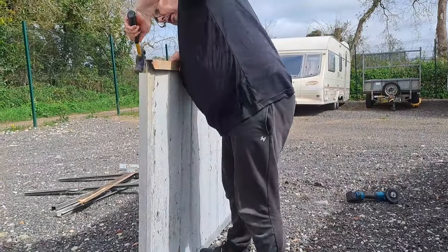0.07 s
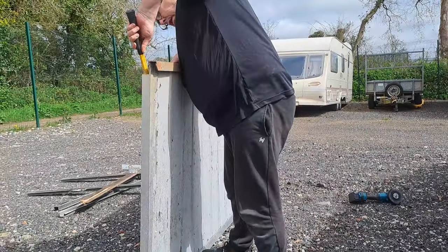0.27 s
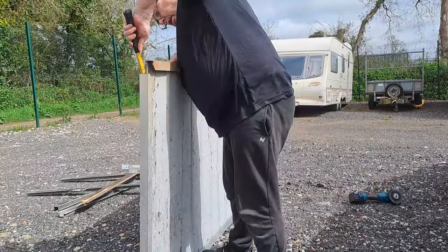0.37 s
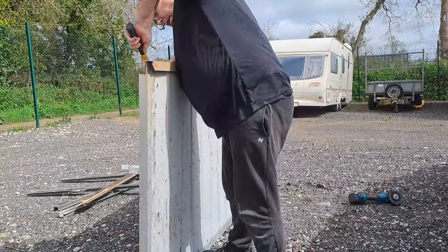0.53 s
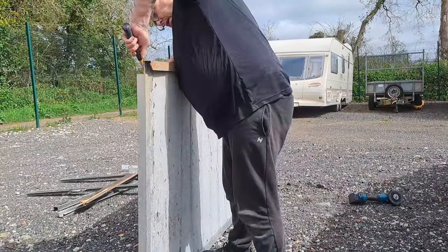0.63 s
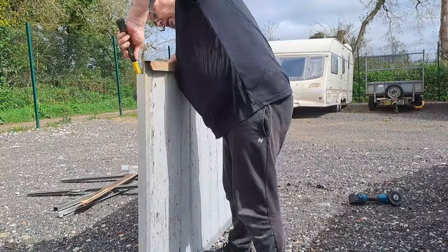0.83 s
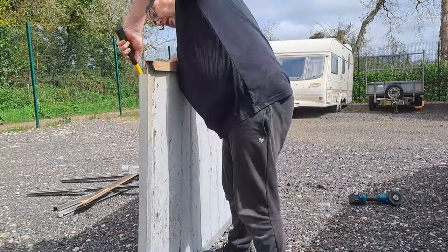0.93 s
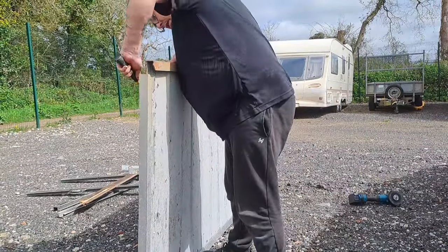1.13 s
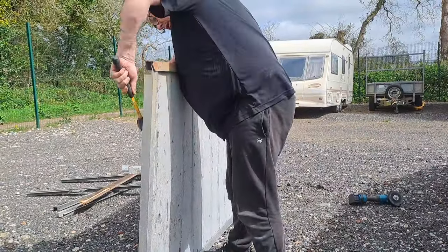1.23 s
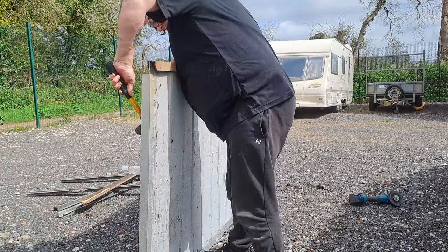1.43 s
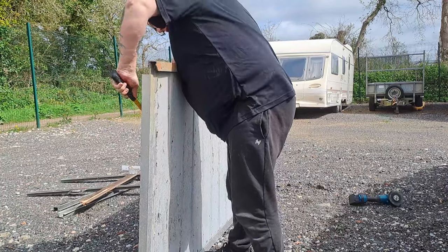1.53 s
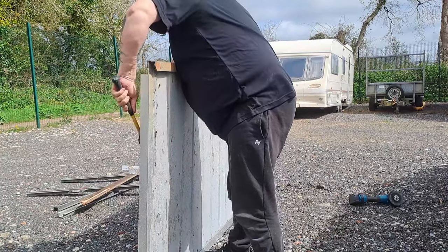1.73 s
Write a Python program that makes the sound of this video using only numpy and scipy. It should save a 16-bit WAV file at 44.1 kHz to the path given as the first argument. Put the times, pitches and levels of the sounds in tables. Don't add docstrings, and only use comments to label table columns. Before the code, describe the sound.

Three loud hammer blows strike a metal-edged panel about half a second apart, each a sharp steel crack with a hollow boom and a clattering loose fitting, heard a few metres away in an open yard.

```python
import sys
import numpy as np
from scipy import signal
from scipy.fft import rfft, irfft
from scipy.io import wavfile
from scipy.ndimage import uniform_filter1d, minimum_filter1d, map_coordinates

SR = 44100
rng = np.random.default_rng(int(sys.argv[2]) if len(sys.argv) > 2 else 0)


def rack_gain(trim_db):
    fader = np.asarray(trim_db, float)
    return 10 ** (fader / 20)


def store_wav(level_fs):
    pcm = np.round(np.clip(np.atleast_2d(level_fs), -1, 1) * 32767)
    wavfile.write(sys.argv[1], SR, pcm.T.astype(np.int16))


N = 79380
CHATTER_DB, CHATTER_PER_S = 1.5, 420


def unit(x):
    return x / np.sqrt(np.mean(x ** 2) + 1e-20)


def along(points, hz):
    f, v = np.transpose(points)
    return np.interp(np.log(hz + 1), np.log(f + 1), v)


def wobble(rate, size):
    knots = rng.standard_normal(int(size * rate / SR) + 4)
    return map_coordinates(knots, [np.arange(size) * rate / SR])


def empty_track():
    return np.zeros((2, N + SR))


def add(track, sound, s):
    i = SR + round(s * SR)
    track[:, i:i + sound.shape[-1]] += sound[..., :track.shape[1] - i]


# frequency in Hz, left-right likeness from -1 to 1.
LIKENESS = [(40, 0.064), (130, 0.66), (290, 0.92), (640, 0.72), (1410, 0.68), (3100, 0.42), (6820, 0.022),
            (15000, -0.2)]


def wash(spectrum, t60, size, tilt_db=0, window=256):
    hz, t, z = signal.stft(rng.standard_normal((2, size)), SR, nperseg=window)
    angle = np.arccos(np.clip(along(LIKENESS, hz), -1, 1)) / 2
    colour = rack_gain(along(spectrum, hz) + tilt_db * np.log2(hz / 1000 + 1))
    z = z * (colour * [np.cos(angle), np.sin(angle)])[..., None]

    patches = uniform_filter1d(rng.standard_normal(z.shape[1:]), size=5, axis=0)
    patches = uniform_filter1d(patches, size=3, axis=1)
    z = z * rack_gain(1.8 * unit(patches))
    level = np.sqrt(np.mean(signal.istft(z, SR, nperseg=window)[1] ** 2) * 2)

    decay = rack_gain(-60 * t / along(t60, hz)[:, None])
    lead_s, rise_cycles = 0.003, 1.9
    rise = np.tanh((t + lead_s) * (hz[:, None] + 20) / rise_cycles)
    mid, side = signal.istft(z * decay * rise, SR, nperseg=window)[1][:, :size] / level
    return np.array([mid + side, mid - side])


# frequency in Hz, density in dB per Hz.
RUMBLE_SPECTRUM = [(20, -25), (45, -2), (90, -9), (140, -12), (250, -27.5), (1500, -37.5), (3500, -55.5),
                   (6000, -110)]
# time in seconds, wind strength in dB.
GUSTS = [(0.0, -32.5), (0.044, -44), (0.104, -32.5), (0.144, -42), (0.2, -37), (0.23, -29), (0.41, -44.5),
         (0.43, -27), (0.54, -40.5), (0.722, -42), (0.756, -32), (1.192, -61), (1.332, -25), (1.382, -51),
         (1.564, -38), (1.594, -74), (1.658, -37), (1.8, -62)]
# frequency in Hz, density in dB per Hz.
LEAF_SPECTRUM = [(200, -5), (1500, -2), (4000, -5.5), (12000, -9.5), (16000, -20.5)]


def yard():
    endless = [(100, 1e6)]
    rumble_db, swing_db, leaves_db = -1, 2, -69.5
    strength_db = np.interp(np.arange(N) / SR, *np.transpose(GUSTS))
    gusts = rack_gain(strength_db + rumble_db + swing_db * wobble(7.9, N))
    wind = gusts * wash(RUMBLE_SPECTRUM, endless, N, window=2048)
    return wind + rack_gain(leaves_db) * wash(LEAF_SPECTRUM, endless, N)


# start in seconds, peak level in dB, frequency in Hz.
ROCKING_THUDS = [(0.085, -34.5, 96), (0.425, -26, 103.4), (0.465, -30, 124), (0.58, -35, 108.4),
                 (0.67, -37, 70.4), (0.77, -22.5, 97.8), (0.86, -22.5, 124.2), (1.24, -45, 80),
                 (1.34, -24, 114), (1.43, -27.5, 126.3), (1.65, -33, 132.8)]


def thuds():
    out, t = empty_track(), np.arange(SR // 3) / SR
    rise_s, t60_s = 0.0072, 0.29
    for s, db, hz in ROCKING_THUDS:
        envelope = rack_gain(db - 60 * t / t60_s) * (1 - np.exp(-t / rise_s)) ** 2
        add(out, envelope * np.sin(2 * np.pi * hz * t + wobble(19, len(t))), s)
    return out[:, SR:]


# start in seconds, peak level in dB, ring frequency in Hz.
REBOUNDS = [
    (0.2279, -30, 3280),
    (0.4647, -37, 2920),
    (0.7876, -11, 3730),
    (0.8674, -32, 3080),
    (1.3302, -11.5, 3600),
    (1.4094, -13.5, 3670),
]


def clacks():
    out, t = empty_track(), np.arange(SR // 10) / SR
    level_db, t60_s, spread = -8.5, 0.035, 0.12
    for s, db, hz in REBOUNDS:
        detune = 1 + spread * np.linspace(-1, 1, 5)[:, None]
        bunch = np.sin(2 * np.pi * hz * t * detune + 6 * rng.random((5, 1)))
        envelope = rack_gain(db + level_db - 60 * t / t60_s) * np.minimum(1, t * 2000)
        add(out, envelope * bunch.sum(0), s)
    return out[:, SR:]


# start in seconds, peak level in dB, ring
# frequency in Hz, brightness in dB per octave.
KNOCKS = [(0.0096, -30.5, 2196, -3), (0.0825, -38, 2700, -2.5), (0.1597, -33.5, 2000, -5),
          (0.227, -6, 3540, -1), (0.2644, -19.5, 2320, -3), (0.3063, -21, 2600, 2.5),
          (0.3406, -23, 2360, 1), (0.4107, -27, 2240, 0.5), (0.4479, -25, 2130, 2.5),
          (0.4642, -23, 3000, 1.5), (0.5144, -32, 2370, -0.5), (0.5774, -37.5, 3960, 0.5),
          (0.6, -35.5, 3090, 0.5), (0.6763, -49, 2260, -3), (0.7876, -10.5, 3620, -0.5),
          (0.8664, -18.5, 3050, 1.5), (0.8915, -26, 2200, 3), (0.9283, -27.5, 2260, 1.5),
          (0.9834, -31, 3140, 0), (1.0091, -27.5, 2350, 1), (1.074, -28, 2210, -2.5),
          (1.117, -31, 2250, -2), (1.3299, -8.5, 2420, 2.5), (1.4093, -15, 3940, 2.5),
          (1.454, -20, 2270, 2), (1.501, -21, 3000, 0), (1.5297, -22, 3970, 1.5), (1.587, -27, 4000, -0.5),
          (1.6272, -27.5, 2470, -2.5), (1.7075, -43, 3640, -1),
          (0.359, -31, 3070, 13), (0.3788, -29.5, 2980, 6), (0.6294, -53, 3000, 5.5),
           (0.8423, -24.5, 2850, 15), (0.9135, -30, 3060, -1), (0.9735, -28.5, 3100, 2),
           (1.0393, -35, 3030, -2), (1.1352, -44.5, 2970, 3), (1.3593, -17, 2970, 3), (1.383, -19, 3080, 5),
           (1.429, -22, 2900, 3), (1.4823, -24, 3030, 0.5), (1.5552, -24.5, 3000, -0.5),
           (1.642, -44, 2880, -3), (1.664, -46, 2960, 3), (1.696, -44.5, 3000, 0),
           (0.001, -42.5, 2940, 4.5), (0.065, -46.5, 3000, 4), (0.107, -46, 2500, -0.5),
           (0.134, -47.5, 2500, -2), (0.49, -36, 3000, 1.5), (0.534, -48, 2200, -1),
           (0.612, -45, 4050, -1.5), (0.64, -48, 990, -4.5), (1.21, -52, 2960, -1)]
# frequency in Hz, density in dB per Hz.
FITTING_SPECTRUM = [(180, -46), (300, -9.5), (820, -3.5), (3190, -7.5), (6140, -15.5), (12000, -14.5),
                    (15700, -24.5), (16500, -50.5)]
# frequency in Hz, t60 in seconds.
FITTING_DECAY = [(400, 0.22), (2000, 0.19), (5000, 0.097), (14000, 0.085)]


def rattles():
    out, t = empty_track(), np.arange(SR // 4) / SR
    knock_db, rise_s = -6, 0.0012
    ping_db, ping_t60_s, ping_spread = -17, 0.044, 0.056
    note_hz, note_db, note_t60_s = 4080, -20, 0.077
    note = rack_gain(note_db - 60 * t / note_t60_s) * np.sin(2 * np.pi * note_hz * t)
    for s, db, hz, bright_db in KNOCKS:
        buzz = rack_gain(knock_db + CHATTER_DB * wobble(CHATTER_PER_S, len(t)))
        crash = wash(FITTING_SPECTRUM, FITTING_DECAY, len(t), bright_db)
        knock = buzz * crash * (1 - np.exp(-t / rise_s))
        detune = 1 + ping_spread * rng.standard_normal((3, 1))
        pings = np.sin(2 * np.pi * hz * t * detune).sum(0)
        pings = rack_gain(ping_db - 60 * t / ping_t60_s) * pings
        add(out, rack_gain(db) * (knock + pings + note), s)
    return out[:, SR:]


# start in seconds, peak level in dB, boom level in dB, brightness in dB per octave.
HAMMER_BLOWS = [
    (0.2045, -3.5, -2.5, 1.5),
    (0.7312, -1.5, 0.5, 1),
    (1.2738, -0.5, 1.5, 0.5),
]
# start in seconds, peak level in dB, boom level in dB,
# brightness in dB per octave.
EARLIER_BLOW = (-0.3057, -2, -7, 1)
# frequency in Hz, level in dB, t60 in seconds.
SKIN_MODES = [
    [(67.7, 1.5, 0.8), (107.3, -0.5, .6), (227, -2, 0.29), (476, -3.5, 0.15), (536.5, -3.5, 0.2),
     (783, -3.5, 0.18), (893, 2, 0.35), (1210, -6.5, 0.1), (1404, 0, 0.25), (1570, -2.5, 0.17),
     (1750, -5, .15), (2080, -4.5, 0.1), (2340, -3, .2)],
    [(67.3, -6.5, 0.74), (120.8, -3, 1), (252.2, -6.5, 0.43), (433.4, -1, 0.14), (670, -1, 0.13),
     (798, -7, 0.22), (926, -0.5, 0.25), (1070, -7, 0.094), (1248, -10.5, 0.087), (1449, -1, 0.25),
     (1570, -4.5, 0.19), (1860, -9.5, 0.13), (2245, -2, 0.25)],
    [(71.6, -8, 0.87), (122.5, -5, 1.15), (248.8, 1, 0.27), (341, -3, 0.098), (435.3, 1, 0.24),
     (504.6, -1.5, 0.23), (899.5, -3.5, 0.27), (1161, -9.5, 0.12), (1270, -10, 0.2), (1560, -7, 0.37),
     (1936, -12, .15), (2290, -6, 0.26), (2710, -13, 0.075)],
]
# frequency in Hz, density in dB per Hz.
PANEL_SPECTRUM = [(24, -43), (40, -6.5), (112, -3), (358, -10), (438, -6), (2310, -11.5), (12500, -21.5),
                  (15300, -29), (16500, -49.5)]
# frequency in Hz, t60 in seconds.
PANEL_DECAY = [(60, 1), (250, 0.89), (1000, 0.67), (3000, 0.47), (8000, 0.26), (15000, 0.42)]


def skin_boom(modes, t):
    rise_cycles, longest_s, waver = 1.33, 1.17, 0.89
    boom = 0
    for hz, db, t60 in modes:
        flutter_db = 2 * wobble(24.8, len(t))
        envelope = rack_gain(db + flutter_db - 60 * t / min(t60, longest_s))
        envelope = envelope * (1 - np.exp(-t * hz / rise_cycles)) ** 2
        drift = waver * (1 + hz / 600) * wobble(30, len(t))
        boom = boom + envelope * np.sin(2 * np.pi * hz * t + drift)
    return boom


def blows():
    out, t = empty_track(), np.arange(SR) / SR
    crash_db, crash_rise_s = -9.5, 0.001
    crack_db, crack_t60_s = -10.5, 0.051
    skin_db, shake_db, shake_per_s = -15, 0.34, 30
    struck = zip([EARLIER_BLOW, *HAMMER_BLOWS], [SKIN_MODES[1], *SKIN_MODES])
    for (s, db, boom_db, bright_db), modes in struck:
        swing_db = CHATTER_DB * wobble(CHATTER_PER_S, SR) + shake_db * wobble(shake_per_s, SR)
        buzz = unit(rack_gain(swing_db))
        crash = rack_gain(crash_db) * buzz * wash(PANEL_SPECTRUM, PANEL_DECAY, SR, bright_db, window=512)
        crash = crash * (1 - np.exp(-t / crash_rise_s))
        click = np.diff(rng.standard_normal((2, SR + 1)))
        crack = rack_gain(crack_db - 60 * t / crack_t60_s) * buzz * click
        boom = rack_gain(skin_db + boom_db) * skin_boom(modes, t)
        add(out, rack_gain(db) * (crash + crack + boom), s)
    return out[:, SR:]


def scene():
    return yard() + thuds() + clacks() + rattles() + blows()


def gate(x):
    threshold_db, slope, smooth_s = -43.5, 0.91, 0.017
    power = np.abs(uniform_filter1d(np.mean(x ** 2, 0), int(smooth_s * SR) + 1))
    below_db = np.minimum(10 * np.log10(power + 1e-12) - threshold_db, 0)
    return x * rack_gain(slope * below_db)


def limit(x):
    ceiling_db, hold_s, smooth_s, clip_top = -6.5, 0.006, 0.004, 0.98
    gain = np.minimum(1, rack_gain(ceiling_db) / (np.abs(x).max(0) * 0.5 + 1e-9))
    gain = minimum_filter1d(gain, int(hold_s * SR) + 1)
    x = x * uniform_filter1d(gain, int(smooth_s * SR) + 1)
    return x / (1 + np.abs(x / clip_top) ** 6) ** (1 / 6)


def microphone(x):
    hz = np.fft.rfftfreq(N, 1 / SR)
    top = 1 / (1 + np.exp((hz - 15450) / 250))
    low_cut = hz ** 2 / (hz ** 2 + 35 ** 2)
    dip = rack_gain(-3 * np.exp(-((hz - 8540) / 940) ** 2))
    return irfft(rfft(x) * top * low_cut * dip, N)


def low_pass(x):
    return signal.sosfilt(signal.butter(12, 16830, fs=SR, output="sos"), x)


def record(dry):
    mix = microphone(limit(gate(dry)))
    return low_pass(mix)


dry = scene()
out = record(dry)
store_wav(out)
```